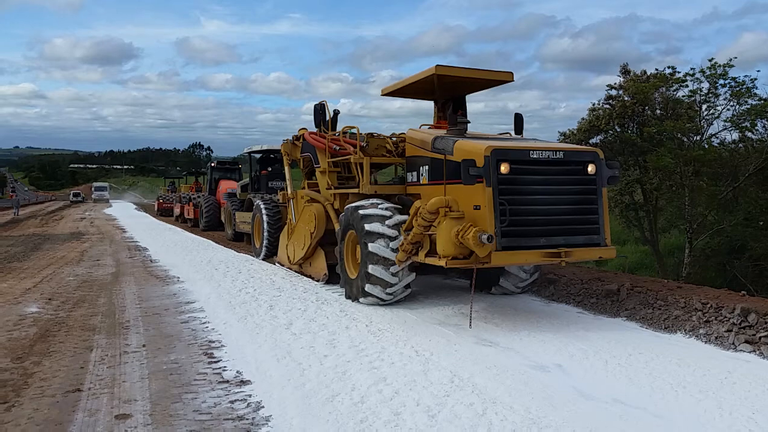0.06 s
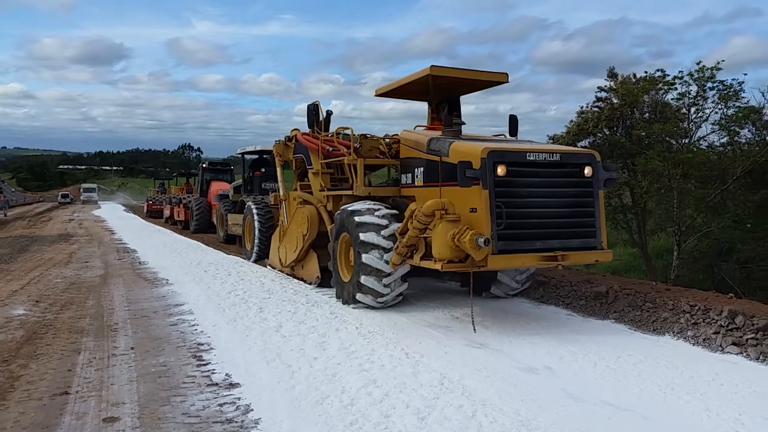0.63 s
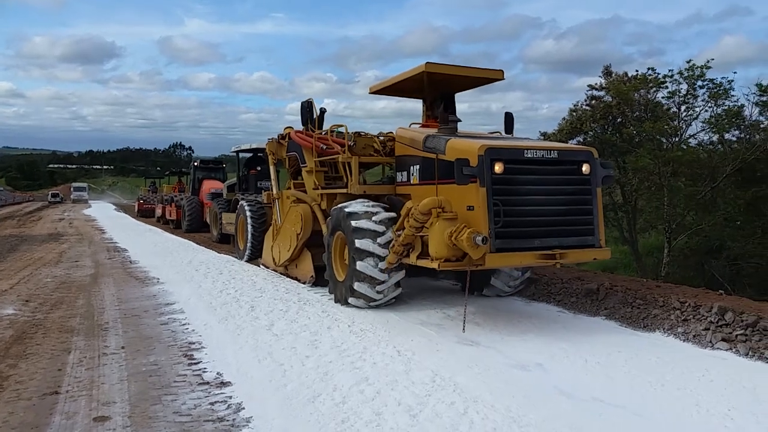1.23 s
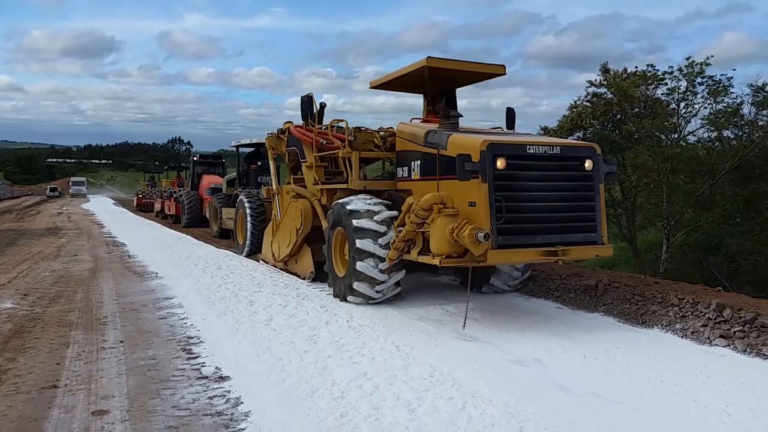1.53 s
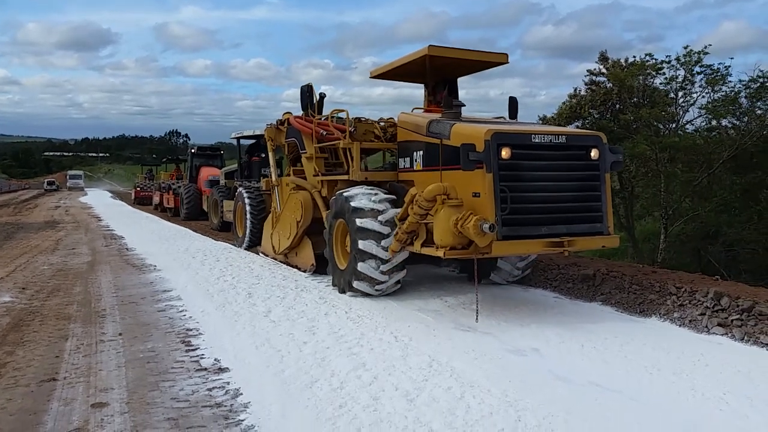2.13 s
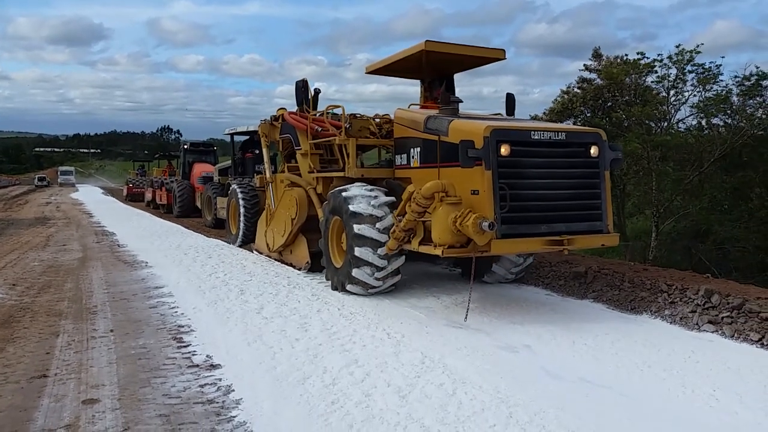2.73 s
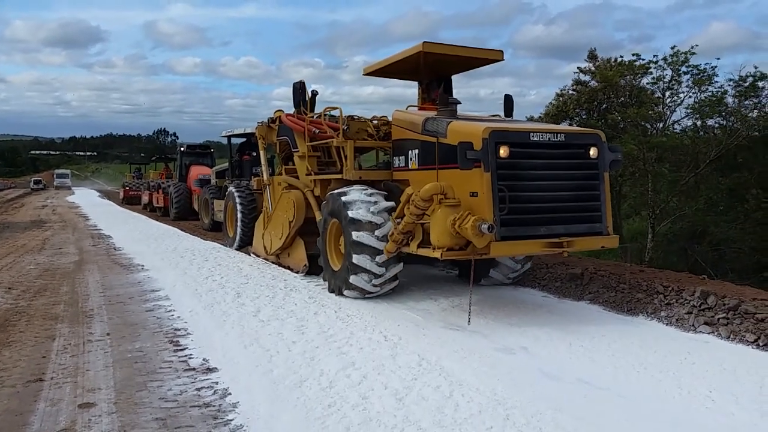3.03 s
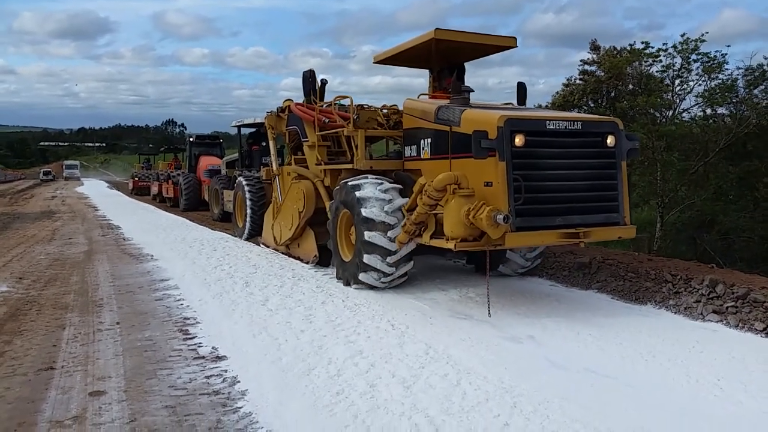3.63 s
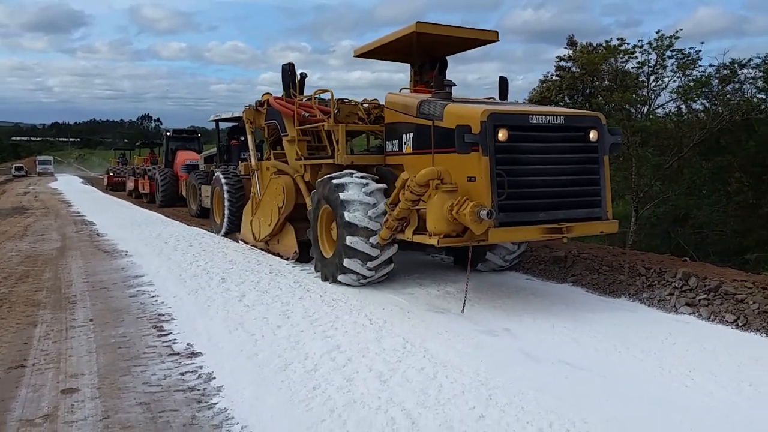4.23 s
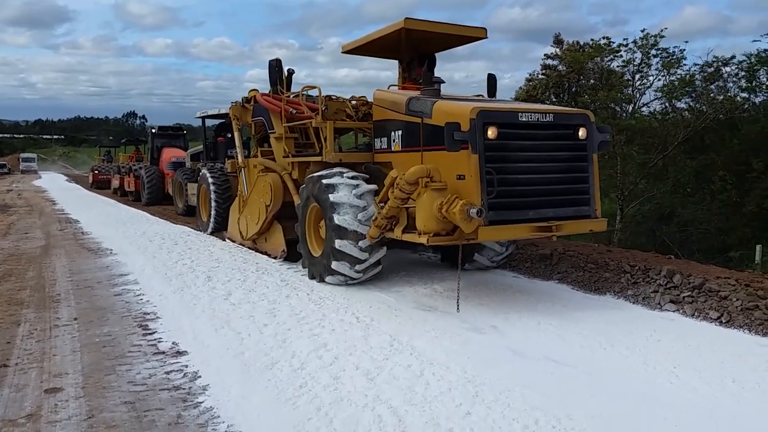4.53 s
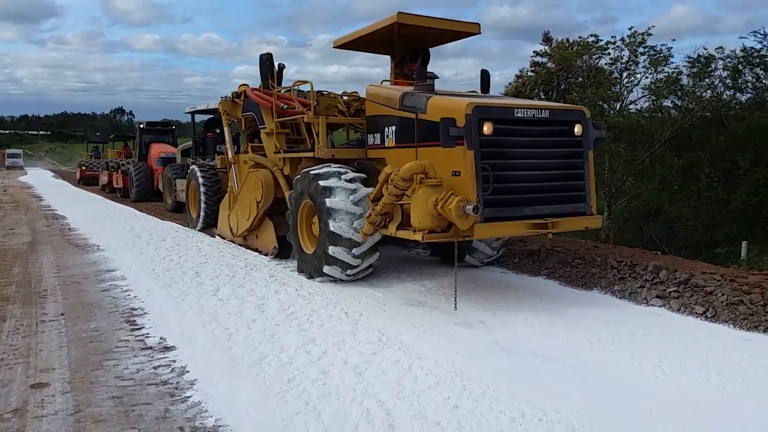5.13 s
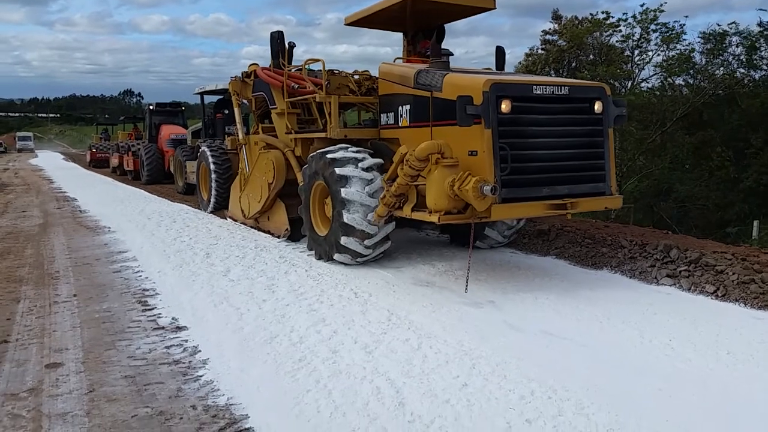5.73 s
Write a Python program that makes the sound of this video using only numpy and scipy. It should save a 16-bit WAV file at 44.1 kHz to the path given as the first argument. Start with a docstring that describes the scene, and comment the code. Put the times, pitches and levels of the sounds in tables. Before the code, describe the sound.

A heavy diesel road construction machine fades in and runs without a break, giving a low drone and rumble with rapid knocking and light metallic clatter. Its cooling fan hisses and a faint high whistle sits on top. The engine speed wavers slightly as it creeps nearer, a little to the left. Distant rollers hum faintly underneath, and two soft puffs of breeze brush the microphone outdoors.

```python
"""A diesel drone fades in from silence: a road reclaimer creeps nearer, its governor hunting.
Six cylinders fire in turn, so one firing rate paces the exhaust pulses, the knock of the block and
the clatter of the injectors. Turbulence makes the cooling fan rush, and the turbocharger whistles.
Vibrating rollers hum further down the roadbed, and a light breeze brushes the two microphone ports."""
import sys
import numpy as np
from scipy import signal
from scipy.fft import rfft, irfft, next_fast_len
from scipy.io import wavfile
from scipy.ndimage import uniform_filter1d, minimum_filter1d, map_coordinates

SR = 44100
rng = np.random.default_rng(int(sys.argv[2]) if len(sys.argv) > 2 else 0)


def log_audio(samples):
    """Write samples as a 16-bit WAV file to the path given in sys.argv[1]."""
    # one column per channel
    frames = np.atleast_2d(samples).T
    # limit to full scale, then quantise
    limited = np.clip(frames, -1, 1)
    pcm = np.round(limited * 32767).astype(np.int16)
    wavfile.write(sys.argv[1], SR, pcm)


N = 263277
TIME = np.arange(N) / SR
NEARNESS = (np.arange(N) / N) ** 2  # 0 far, 1 near

# Exhaust tones. Each row: multiple of the firing rate, relative level in dB, unsteadiness in dB,
# gain when near in dB.
EXHAUST_HARMONICS = [(1, 0, 0.85, -1), (2, -25.5, 4, 15.5), (3, -6.5, 2.5, 2.5), (7, -31, 4.5, 11),
                     (8, -14.5, 5.5, -6)]
# Exhaust and chassis turbulence. Each row: frequency in Hz, relative spectral level in dB.
RUMBLE_SPECTRUM = [(10, -26), (25, -6), (45, -5), (80, -2), (130, 0.5), (175, 0.5), (220, -2), (265, 4.5),
                   (320, -2.5), (380, -7), (450, -15.5), (800, -8), (2000, -72)]
# Cylinders in firing order. Each row: relative combustion strength in dB, injector strength in dB.
CYLINDER_STRENGTHS = [(1, 10.5), (1, 11), (-9, 13), (3.5, 10), (2, 12.5), (1, 10.5)]
# Resonances of the block and of its thin covers. Each row: frequency in Hz, bandwidth in Hz,
# relative level when far in dB, relative level when near in dB.
BLOCK_MODES = [(590, 166, -7.5, -1.5), (705.4, 62, 0, 3.5), (968.5, 40, -6.5, -12), (1258.5, 98, -7.5, -3),
               (1638, 78, -11.5, -11.5), (1980, 236, -18.5, -13)]
COVER_MODES = [(2200, 37, -6, 2), (2465, 90, 2.5, 2), (3256, 104, -7.5, -4.5), (3697, 134, -10, -6.5)]
# Course of the injector clatter and of the fan rush. Each row: time in seconds, relative level in dB.
CLATTER_LEVELS = [(1.0, -32.5), (1.45, -28), (2.15, -30), (2.55, -35), (2.75, -31), (4.05, -31),
                  (4.5, -34.5), (5.3, -35), (5.75, -31)]
FAN_LEVELS = [(0.6, -28), (0.92, -29), (1.03, -32.3), (1.47, -29), (2.04, -28.5), (2.16, -32.5),
              (2.32, -29), (2.5, -35.5), (2.66, -31.5), (2.76, -28.8), (3.12, -28.2), (3.32, -29),
              (4.1, -30), (5.2, -31), (5.7, -27.5)]
# Fan rush as each port colours it. Each row: frequency in Hz, relative spectral level in dB.
FAN_SPECTRUM_LEFT = [(1500, -40), (3000, -20), (4500, -15), (5050, -17), (5700, -15), (6700, -15),
                     (7300, -7), (7900, -.5), (8500, -4), (9200, -11), (10700, -8.5), (11400, -13.5),
                     (12800, -14.5), (15000, -23)]
FAN_SPECTRUM_RIGHT = [(1500, -30), (3000, -21), (4200, -12.5), (5000, -20), (5700, -28), (6300, -22.5),
                      (7300, -25), (8500, -37), (9500, -28), (10700, -23), (12400, -19.5), (13700, -10.5),
                      (14600, -13), (15700, -18)]
# Vibrating roller drums. Each row: frequency in Hz, level in dB.
ROLLER_TONES = [(27, -35.5), (27.75, -53), (52.6, -32.5), (54.6, -38.5), (98.4, -30.5)]
# Puffs of air. Each row: middle in seconds, half length in seconds, level in dB.
BREEZE_PUFFS = [(3.25, 0.16, -25), (4.457, 0.26, -22)]
# Eddies at the ports. Each row: frequency in Hz, relative spectral level in dB.
EDDY_SPECTRUM = [(8, -20), (25, -3), (50, 14), (120, 16), (220, 10), (500, -11), (1500, -64)]
# Left port against right. Each row: frequency in Hz, excess level in dB, phase lead in radians.
PORT_BALANCE = [(90, 0.2, 0.18), (150, 0.5, 0.16), (270, 2.1, 0.39), (344, 2.5, -0.093), (453, 2, 0.61),
                (580, 4.5, .3), (705, 6.5, 0.34), (1000, 5.5, -0.18), (1330, 9.5, 0.63), (1660, -0.5, -1),
                (2030, 0.5, 0.92), (2384, 12.5, 1.85), (3100, 13, -1.8), (4160, 9, -2.25)]
# Likeness of the noise at the two ports. Each row: frequency in Hz, correlation from 0 to 1.
PORT_COHERENCE = [(60, 0.78), (130, 0.92), (280, 0.99), (430, 0.87), (640, 1), (1250, 0.83), (1700, 0.39),
                  (2450, 1), (4000, 0.53)]

COMBUSTION_DB, INJECTOR_DB = np.transpose(CYLINDER_STRENGTHS)
CYLINDER_COUNT = len(CYLINDER_STRENGTHS)


def exhaust(firings, drone_db, rumble_db):
    """Periodic gas pulses radiate harmonics of the firing rate, over turbulence that puffs in step."""
    tones = 0
    for multiple, db, unsteady_db, near_db in EXHAUST_HARMONICS:
        wander = 0.11 * unsteady_db * wobble(14)  # hot gas shifts the phase as well as the level
        phase = 2 * np.pi * multiple * firings + wander
        tone = unit(amp(unsteady_db * wobble(18)) * np.sin(phase))
        tones = tones + amp(db + near_db * NEARNESS) * tone
    puffs = stereo_noise() * blows(firings, COMBUSTION_DB, decay=0.47, scatter_db=1.5, steady=2.1)
    rumble = unit(filtered(puffs, lambda hz: amp(along(RUMBLE_SPECTRUM, hz))))
    return amp(drone_db) * tones + amp(rumble_db) * rumble


def governor(load, set_hz=88.43, sag_hz=1.51, hunt_hz=1.0, period_s=0.428, crest_s=0.713):
    """Feedback overshoot swings the firing rate about a mean that sags under load."""
    return set_hz - sag_hz * load + hunt_hz * np.cos(2 * np.pi * (TIME - crest_s) / period_s)


def block_knock(firings, knock_db):
    """Impact excitation: each combustion rings the modes of the heavy block."""
    hits = blows(firings, COMBUSTION_DB, decay=0.19, scatter_db=2.6, steady=4.4)
    return amp(knock_db) * ringing(cyclic_noise(firings, repeat=0.15) * hits, BLOCK_MODES)


def injectors(firings, gain_db=4.5):
    """Injectors and valves snap shut, and the impacts excite the high modes of the thin covers."""
    strikes = blows(firings, INJECTOR_DB, decay=0.33, scatter_db=0.9, steady=0.9)
    clatter = ringing(cyclic_noise(firings, repeat=0.17) * strikes, COVER_MODES)
    return amp(curve(CLATTER_LEVELS) + gain_db) * clatter


def fan(firings, gain_db=5.5, patchy_db=2.7, drift=0.025, throb_db=0.5):
    """Turbulent flow through the grille makes broadband noise, modulated by fine engine ticking."""
    noise = rng.standard_normal((2, N)) + 0.11 * rng.standard_normal(N)  # a little is common to both
    noise *= blows(firings, INJECTOR_DB, decay=0.5, scatter_db=0.7, steady=2.8)
    noise *= amp(throb_db * np.sin(2 * np.pi * firings / CYLINDER_COUNT))  # one swell per engine cycle
    hz, t, spectra = signal.stft(noise, SR, nperseg=512)
    lookup_hz = hz[:, None] * (1 + drift * (t / t[-1] - 0.5))  # the colour slides down on approach
    colour_db = np.array([along(FAN_SPECTRUM_LEFT, lookup_hz), along(FAN_SPECTRUM_RIGHT, lookup_hz)])
    patches = uniform_filter1d(rng.standard_normal(spectra.shape[1:]), size=4, axis=0)
    patches = unit(uniform_filter1d(patches, size=50, axis=1))  # smooth in frequency and in time
    spectra *= amp(colour_db + patchy_db * patches)
    left, right = signal.istft(spectra, nperseg=512)[1][:, :N]
    late_right = np.roll(right, 4)  # the sound reaches the right port 4 samples later
    level_db = curve(FAN_LEVELS) + gain_db + 0.74 * wobble(9.1)
    return amp(level_db) * unit(np.array([left, late_right]))


def turbocharger(firing_hz, whistle_hz=9755, jitter_hz=22, left_db=-43, right_gain_db=-16):
    """The compressor's tone leans with engine speed; random modulation broadens it to a fuzzy whistle."""
    pitch_hz = whistle_hz * (1 + 0.116 * (firing_hz / firing_hz.mean() - 1))
    pitch_hz += jitter_hz * wobble(150) + 12 * wobble(4)
    flicker = amp(7.1 * wobble(40) + 0.69 * wobble(2.8))
    tone = unit(flicker * np.sin(2 * np.pi * np.cumsum(pitch_hz) / SR))
    return amp(left_db) * tone * amp([[0], [right_gain_db]])


def rollers():
    """Rotating unbalance: eccentric weights shake the drums, and neighbouring frequencies beat."""
    hum = 0
    for hz, db in ROLLER_TONES:
        peak = np.sqrt(2) * amp(db + 1.9 * wobble(2.76))
        hum = hum + peak * np.sin(2 * np.pi * hz * TIME + 1.1 * wobble(1.71))
    return hum


def breeze(calm_db=-47, right_gain_db=6.5, lumpy_db=3):
    """Eddies make independent pressure fluctuations at each port, stronger in each puff."""
    strength = amp(calm_db) + sum(amp(db) * swell(s, half_s) for s, half_s, db in BREEZE_PUFFS)
    eddies = filtered(rng.standard_normal((2, N)), lambda hz: amp(along(EDDY_SPECTRUM, hz)))
    lumps = amp(lumpy_db * np.array([wobble(5.8), wobble(5.5)]))
    return strength * unit(eddies * lumps) * amp([[0], [right_gain_db]])


def ports(hz):
    """Acoustic shadowing: the left port faces the machine, and the housing shades the right."""
    table = np.array(PORT_BALANCE)
    pan = np.arctan(amp(along(table[:, :2], hz)))
    lead = np.exp(0.5j * along(table[:, ::2], hz))
    return np.sqrt(2) * np.array([np.sin(pan) * lead, np.cos(pan) / lead])


def blows(firings, cylinder_db, decay, scatter_db, steady):
    """Exponential decay: each firing's blow dies over a share (decay) of the gap, on a steady floor."""
    index = firings.astype(int)
    size_db = cylinder_db[index % CYLINDER_COUNT] + scatter_db * rng.standard_normal(SR // 20)[index]
    pulses = amp(size_db) * np.exp(-(firings % 1) / decay)
    return unit(steady + unit(pulses))


def ringing(force, modes):
    """Modal superposition: damped resonances add, their balance shifting as the machine nears."""
    hz, width, far_db, near_db = np.transpose(modes)[:, :, None]
    sign = (-1) ** np.arange(len(modes))[:, None]

    def radiated(db):
        resonances = lambda f: 1j * f * width / (hz ** 2 - f ** 2 + 1j * f * width)
        return unit(filtered(force, lambda f: np.sum(sign * amp(db) * resonances(f), axis=0)))

    return (1 - NEARNESS) * radiated(far_db) + NEARNESS * radiated(near_db)


def cyclic_noise(firings, repeat, knots=2400):
    """Partial periodicity: a share (repeat) of the noise power recurs with every engine cycle."""
    cycle_phase = firings / CYLINDER_COUNT % 1
    recurring = map_coordinates(rng.standard_normal(knots), [cycle_phase * knots], mode="grid-wrap")
    return np.sqrt(repeat) * recurring + np.sqrt(1 - repeat) * stereo_noise()


def stereo_noise():
    """Partial coherence: the ratio of mid to side sets how alike two white noises are at each pitch."""
    angle = lambda hz: np.arccos(along(PORT_COHERENCE, hz)) / 2
    weights = lambda hz: np.array([np.cos(angle(hz)), np.sin(angle(hz))])
    mid, side = filtered(rng.standard_normal((2, N)), weights)
    return np.array([mid + side, mid - side])


def limiter(x, ceiling=0.88, window=257):
    """Peak limiting: the gain ducks for a few milliseconds around any peak above the ceiling."""
    needed = np.minimum(1, ceiling / (abs(x).max(axis=0) + 1e-9))
    return x * uniform_filter1d(minimum_filter1d(needed, size=window), size=window)


def filtered(x, response):
    """Linear filtering: the spectrum is multiplied by a complex frequency response."""
    size = next_fast_len(N + SR // 2)
    return irfft(rfft(x, size) * response(np.fft.rfftfreq(size, 1 / SR)), size)[..., :N]


def amp(db):
    """Decibels as an amplitude ratio."""
    return 10 ** (np.asarray(db) / 20)


def unit(x):
    """Normalisation to rms 1."""
    return x / np.sqrt(np.mean(x ** 2) + 1e-20)


def along(points, hz):
    """Interpolation of (Hz, value) points on a logarithmic frequency axis."""
    point_hz, values = np.transpose(points)
    return np.interp(np.log(hz + 1), np.log(point_hz + 1), values)


def curve(points):
    """Linear interpolation of (seconds, value) points at every sample."""
    return np.interp(TIME, *np.transpose(points))


def wobble(rate):
    """Smooth random fluctuation through rate knots a second."""
    return map_coordinates(rng.standard_normal(int(N * rate / SR) + 4), [TIME * rate])


def swell(middle_s, half_s):
    """A Gaussian rise and fall, 1 at its middle."""
    return np.exp(-((TIME - middle_s) / half_s) ** 2)


def scene():
    """Sources superpose; one crankshaft paces the engine, and load makes it slower and louder."""
    load = swell(middle_s=3.28, half_s=1.79)  # a stretch of heavier going
    ease_db = -2 * swell(middle_s=4.77, half_s=0.52)  # drone and knock soften as the load lets up
    firing_hz = governor(load)
    firings = np.cumsum(firing_hz) / SR
    drone_db = -18.5 + 2 * load + 2.05 * NEARNESS + ease_db
    rumble_db = -21 + 0.37 * load + 2 * NEARNESS
    knock_db = -21.5 + 0.2 * load + 1.7 * NEARNESS + ease_db
    engine = exhaust(firings, drone_db, rumble_db) + block_knock(firings, knock_db) + injectors(firings)
    return filtered(engine + rollers(), ports) + fan(firings, guard := 5.5) + turbocharger(firing_hz) + breeze()


def record(dry, open_s=0.31, fade_s=0.3, top_hz=15750):
    """Gain and bandwidth shaping: peaks are limited, the sound fades in, and the top treble is cut."""
    faint = amp(-77.5) * (TIME / open_s) ** 4
    ramp = np.minimum(amp(-29) + (TIME - open_s) / fade_s, 1)
    fade = np.where(TIME < open_s, faint, ramp)
    return filtered(limiter(dry) * fade, lambda hz: np.clip((top_hz - hz) / 80 + 0.5, 0, 1))


dry = scene()
out = record(dry)
log_audio(out)
```